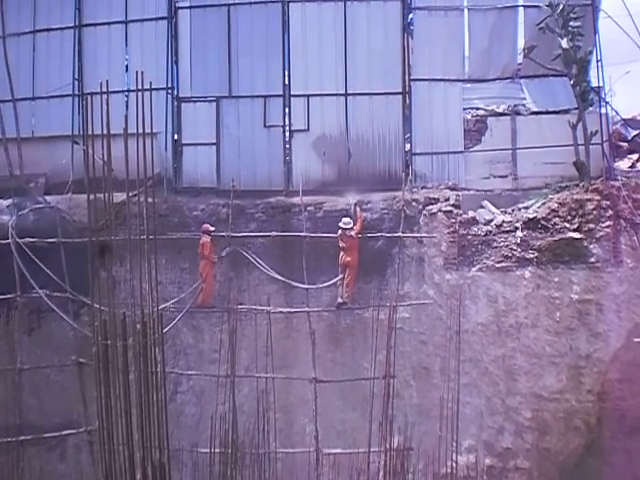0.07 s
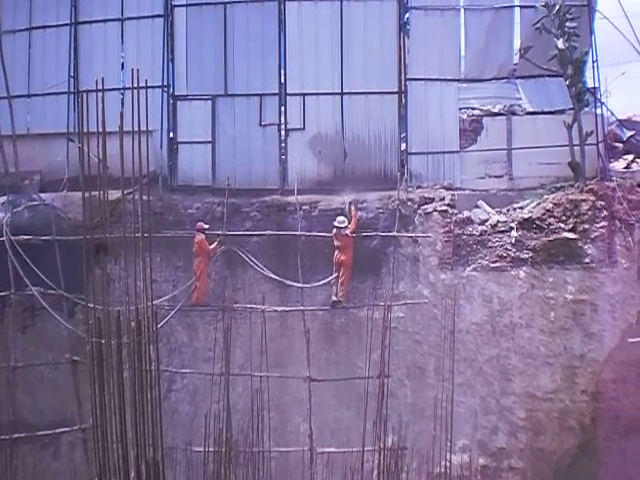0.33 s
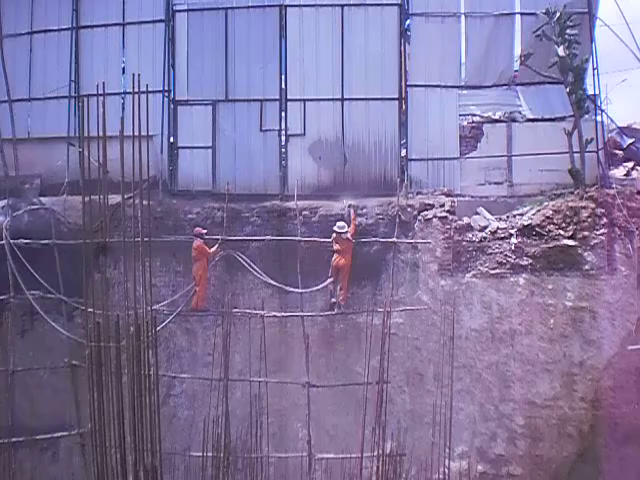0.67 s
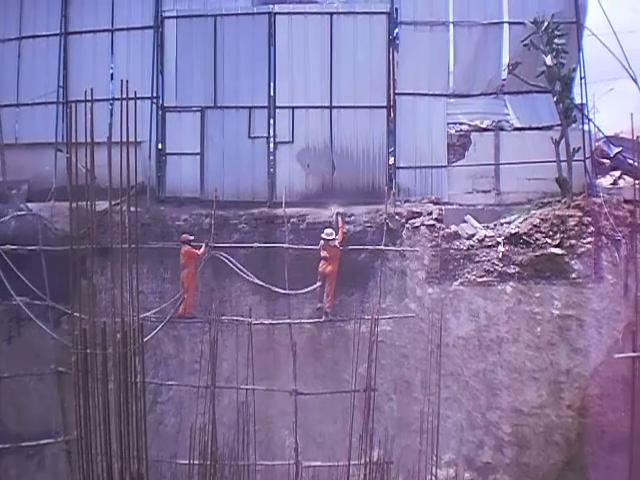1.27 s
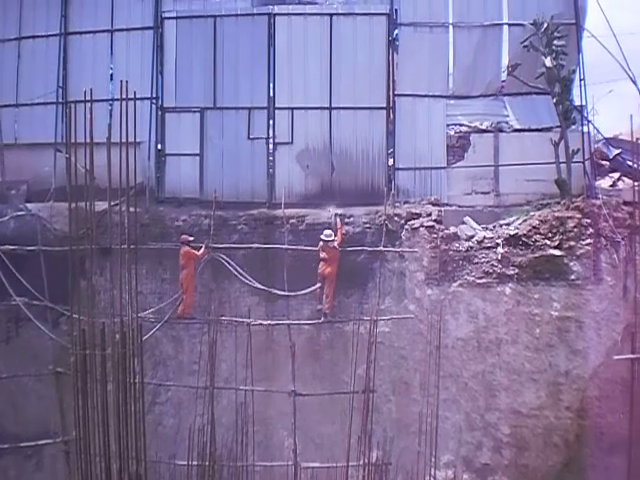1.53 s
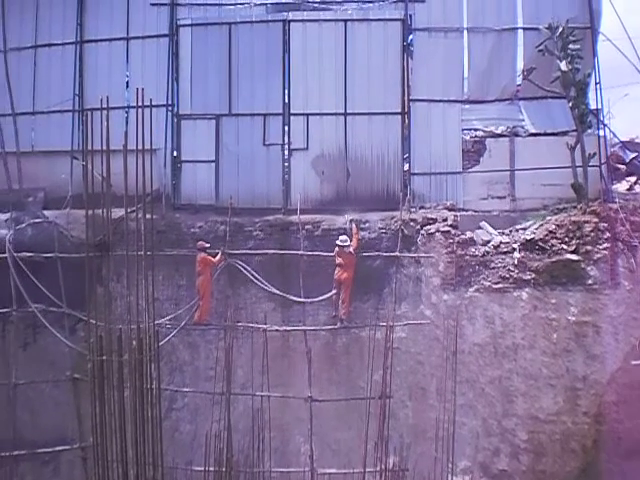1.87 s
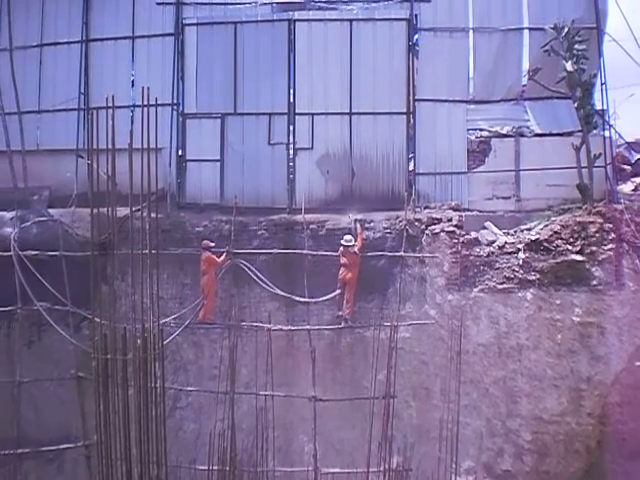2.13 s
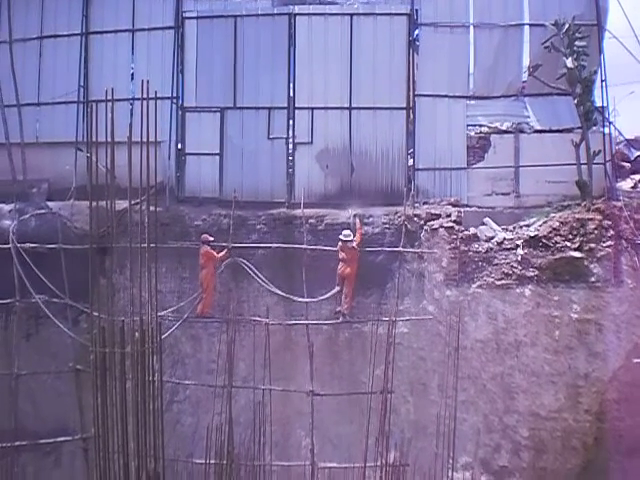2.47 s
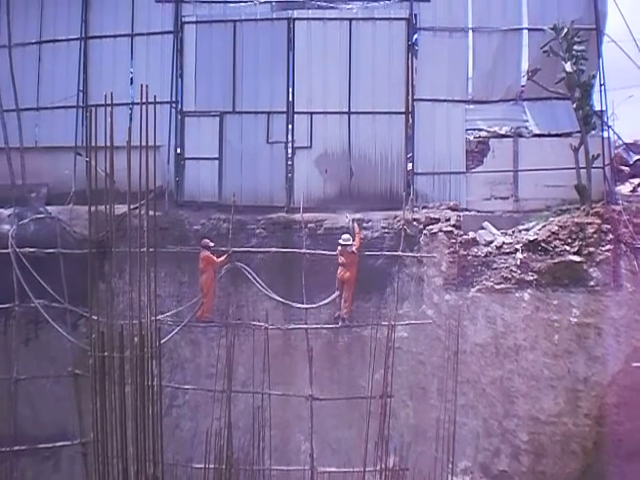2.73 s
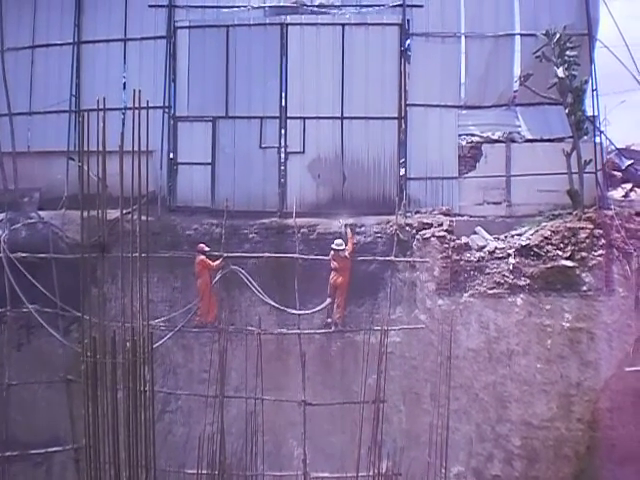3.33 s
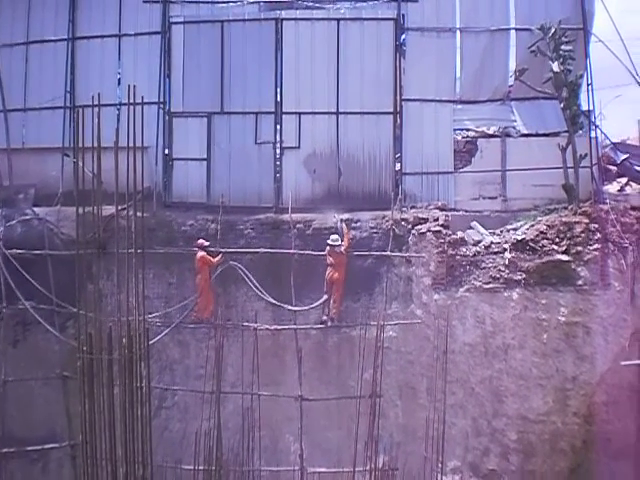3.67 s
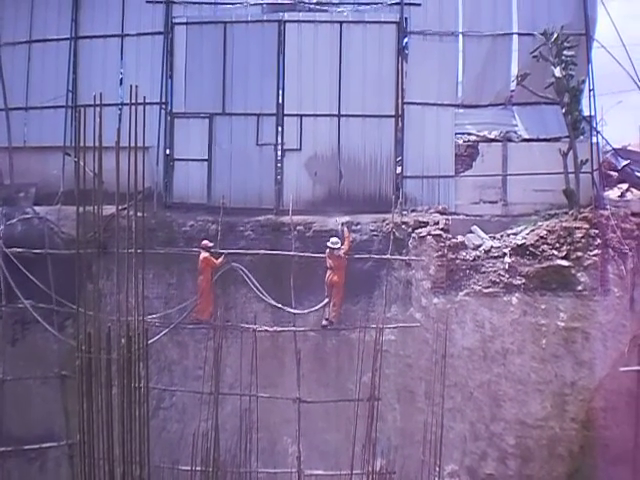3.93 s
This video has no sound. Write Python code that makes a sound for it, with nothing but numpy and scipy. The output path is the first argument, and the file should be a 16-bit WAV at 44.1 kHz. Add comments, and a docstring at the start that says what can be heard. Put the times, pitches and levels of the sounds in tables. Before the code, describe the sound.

Loud hissing jet of sprayed concrete opens up over steady compressor noise.

```python
"""Concrete is sprayed onto the wall of a building pit. From the start a compressor drones under a
steady machine roar, and air hisses from the nozzle, which spits once hard and twice faintly.
At 1.2 s it opens into a hard jet with a hollow whistle in it, washing against the wall.
The recorder passes little treble, and overload ticks crackle over the loud stretches of the jet."""
import sys
import numpy as np
from scipy import signal
from scipy.fft import rfft, irfft
from scipy.io import wavfile

SR = 44100
rng = np.random.default_rng(int(sys.argv[2]) if len(sys.argv) > 2 else 0)


def wav_out(sig):
    """Save sig, one row per channel (or a flat mono array), as 16-bit PCM at SR to the path in sys.argv[1]."""
    wavfile.write(sys.argv[1], SR, np.round(np.clip(np.atleast_2d(sig).T, -1, 1) * 32767).astype(np.int16))


N = 176400
TIME = np.arange(N) / SR


def from_db(db):
    """Decibels to gain."""
    return 10 ** (np.asarray(db) / 20)


def unit_rms(x):
    """Scale to rms 1."""
    return x / np.sqrt(np.mean(x ** 2) + 1e-20)


def automation(rows):
    """One curve per value column, joining its breakpoints in time."""
    times, *columns = np.transpose(rows)
    return [np.interp(TIME, times, column) for column in columns]


def drift(rate_hz):
    """Smooth random wandering, rms about 1."""
    pole = np.exp(-80 * np.pi * rate_hz / SR)
    noise = rng.standard_normal(N // 40 + 2002)  # one value per 40 samples
    slow = signal.lfilter([1], [1, -2 * pole, pole * pole], noise)[2000:]
    return np.interp(np.arange(N) / 40, np.arange(len(slow)), unit_rms(slow))


def turbulence(colour):
    """Noise of the given colour, falling 24 dB per octave beyond its ends; rms 1."""
    hz, db = np.transpose(colour)
    bins_hz = np.maximum(np.arange(N // 2 + 1) * SR / N, 1)
    octaves_outside = np.maximum(np.log2(bins_hz / hz[-1]), 0) + np.maximum(np.log2(hz[0] / bins_hz), 0)
    gain = from_db(np.interp(np.log(bins_hz), np.log(hz), db) - 24 * octaves_outside)
    return unit_rms(irfft(rfft(rng.standard_normal(N)) * gain, N))


def resonance(hz, width_hz):
    """Noise ringing in one resonance with steep skirts; rms 1."""
    bins_hz = np.arange(N // 2 + 1) * SR / N
    response = 1 / (1 + 1j * (bins_hz - hz) / width_hz) ** 2
    return unit_rms(irfft(rfft(rng.standard_normal(N)) * response, N))


def compressor():
    """A nearly pure exhaust note with a weak octave, over a rumble whose low end swells once."""
    # exhaust note: time_s, pitch_hz, level_db
    drone = [(0, 87.2, -20), (1.4, 86.1, -20), (2.5, 86, -21), (3.1, 86, -23.5), (3.45, 86, -25),
             (3.62, 86.3, -27), (3.85, 90.8, -26), (4, 93.7, -20)]
    # machine rumble: frequency_hz, relative_db
    rumble_colour = [(10, -17.5), (22, -1.5), (32, -5), (46, -2), (62, 1), (85, -5.5), (112, -5),
                     (135, -4.5), (165, -7), (220, -12), (400, -41.5)]
    # swell of the deepest rumble: time_s, level_db
    deep_swell = [(0, -38.5), (1.1, -31.5), (1.6, -29), (2.1, -31), (2.6, -37.5), (4, -38.5)]
    pitch_hz, level_db = automation(drone)
    deep_db, = automation(deep_swell)
    phase = 2 * np.pi * np.cumsum(pitch_hz) / SR
    note = np.sqrt(2) * (np.sin(phase) + from_db(-30) * np.sin(2 * phase))
    rumble = from_db(-25) * turbulence(rumble_colour)
    deep = from_db(deep_db) * resonance(hz=45, width_hz=6.1)
    return note * from_db(level_db + .6 * drift(rate_hz=6)) + rumble + deep


def machines():
    """A steady roar with ringing housings, some slowly gaining or losing strength."""
    # housing resonances: pitch_hz, width_hz, starting_level_db, change_db_per_s
    housings = [(148, 15, -38.5, -2.5), (378.6, 19, -34.5, 0.93), (427.5, 34, -40, 1.8),
                (536.8, 20, -44.5, 0), (779, 40, -30.5, -2.5), (863, 38, -37.5, 0), (1022.5, 39, -43, 1.2),
                (1095, 21, -39.5, -1), (1217, 25, -41, 0), (1257, 36, -35, -2), (1378, 19, -41, 0.5)]
    # roar in the pit: frequency_hz, relative_db
    roar_colour = [(120, -16), (200, -6), (250, 0.5), (310, -3.5), (400, -2), (480, -2), (560, -2),
                   (660, -3.5), (790, -0.5), (920, -2.5), (1100, -5), (1350, -3), (1600, -8.5),
                   (1950, -15.5), (2600, -13), (4000, -39.5)]
    rings = sum(from_db(db + db_per_s * TIME) * resonance(hz, width_hz)
                for hz, width_hz, db, db_per_s in housings)
    return from_db(-22.5 + .5 * drift(rate_hz=15)) * turbulence(roar_colour) + rings


def nozzle_air():
    """Air leaves the nozzle in a thin, constant hiss."""
    # escaping air: frequency_hz, relative_db
    air_colour = [(1400, -15), (2000, -11), (2400, -6), (2750, 2.5), (3100, -4.5), (3500, -2), (3750, -4),
                  (4000, -17.5), (4250, -19), (4500, -26)]
    return from_db(-30 + .27 * drift(rate_hz=6)) * turbulence(air_colour)


def spits():
    """Short bright bursts as slugs of mix leave the nozzle."""
    # slugs of mix: centre_s, length_s, level_db
    slugs = [(.415, 0.041, -16), (.485, 0.042, -26), (.85, 0.026, -29.5)]
    # burst of a slug: frequency_hz, relative_db
    spit_colour = [(500, -10.5), (1300, -5.5), (2000, -14.5), (2400, -1), (2950, -0.5), (3300, 0.5),
                   (3700, 0), (4000, -11), (4300, -14.5), (4550, -23)]
    envelope = sum(from_db(db) * np.exp(-2 * ((TIME - centre_s) / length_s) ** 2)
                   for centre_s, length_s, db in slugs)
    return envelope * turbulence(spit_colour)


def jet():
    """A faint hiss jumps to full force; its wash on the wall starts strong, then eases."""
    # strength of the jet: time_s, level_db
    strength = [(0, -35.5), (1.18, -46.5), (1.236, -19), (1.4, -18.5), (1.62, -17), (1.95, -19),
                (2.2, -16.5), (2.3, -16.5), (2.51, -17), (2.66, -19.5), (3.2, -20), (3.55, -20.5), (4, -20)]
    # hiss of the jet: frequency_hz, relative_db
    hiss_colour = [(1500, -17.5), (2020, -10), (2200, -4.5), (2380, 5), (2650, -3.5), (2830, -1),
                   (3030, 0.5), (3220, -5.5), (3400, -5.5), (3560, -4), (3790, -4.5), (3980, -17.5),
                   (4230, -16.5), (4500, -22.5)]
    # mix striking the wall: frequency_hz, relative_db
    wash_colour = [(500, -29.5), (800, -9), (1030, 6), (1230, 2.5), (1450, -0.5), (1680, 2), (1880, -3),
                   (2100, -18.5), (3000, -33)]
    open_s, attack_s, fade_db_per_s = 1.2, .046, 1.0
    jet_db, = automation(strength)
    opened = np.clip((TIME - open_s) / attack_s, 0, 1)
    hiss = from_db(jet_db) * turbulence(hiss_colour)
    wash = opened * from_db(-22 - fade_db_per_s * (TIME - open_s)) * turbulence(wash_colour)
    return hiss + wash + whistle(jet_db, opened)


def whistle(jet_db, opened):
    """The open jet rings the nozzle's resonances; each flutters, and the lowest two flare once."""
    # nozzle resonances: pitch_hz, width_hz, relative_db
    modes = [(2340, 30, -15.5), (2444, 11, -12), (2540, 16, -16.5), (2794, 16, -17.5), (3024, 44, -21.5),
             (3535, 23, -18.5), (3757, 67, -21.5)]
    flare_s, flare_width_s, flare_peak_db, flutter_db = 2.19, .035, 9.5, 2.3
    flare_db = flare_peak_db * np.exp(-.5 * ((TIME - flare_s) / flare_width_s) ** 2)
    rings = np.zeros(N)
    for k, (hz, width_hz, db) in enumerate(modes):
        mode_db = db + flutter_db * drift(rate_hz=4.6) + flare_db * (k < 2)
        rings += from_db(mode_db) * resonance(hz, width_hz)
    average_db = np.average(jet_db, weights=opened)
    drive_db = average_db + .54 * (jet_db - average_db)  # follows about half of the jet's swing
    return opened * from_db(drive_db) * rings


def overload_ticks():
    """Each placed tick is one spike, sharp or blunt, with a very short ring."""
    # overload ticks: start_s, level_db, cutoff_hz
    ticks = [(1.358, -31, 15000), (1.3635, -17, 10100), (1.46, -38, 16000), (1.567, -29, 4400),
             (1.5748, -20, 5800), (1.592, -22.5, 16000), (1.6425, -24.5, 16100), (1.661, -22, 4500),
             (1.6675, -25, 15000), (1.695, -26, 16000), (1.72, -24, 4500), (1.727, -26, 16000),
             (1.74, -29, 4800), (1.7703, -22, 16000), (1.7955, -20, 4400), (1.811, -19.5, 16000),
             (2.098, -41, 16000), (2.2642, -30.5, 11000), (2.27, -26, 5400), (2.3225, -17, 4800),
             (2.3315, -25, 16000), (2.345, -16, 10500), (2.3645, -33, 16000), (2.386, -20, 16000),
             (2.407, -26, 4100), (2.451, -16, 5200), (2.455, -23, 16000), (2.473, -33, 16000),
             (2.5124, -27, 15200), (2.566, -18, 4420), (2.572, -28, 10000), (2.734, -47, 16000),
             (2.9825, -23, 4400), (2.992, -29, 15000), (3.011, -31.5, 16000), (3.127, -31, 15000)]
    ring_hz, ring_decay_s, dull_hz = 4650, .001, 3000
    out, t = np.zeros(N), TIME[:SR // 100]
    ring = from_db(-14.5) * np.exp(-t / ring_decay_s) * np.cos(2 * np.pi * ring_hz * t)
    spike = np.exp(-2 * np.pi * dull_hz * t) + ring
    for start_s, db, cutoff_hz in ticks:
        tick = signal.sosfilt(signal.butter(6, cutoff_hz, fs=SR, output="sos"), spike)
        start = int(start_s * SR)
        out[start:start + len(tick)] += from_db(db) * rng.choice([-1, 1]) * tick
    return out


def pit_echoes(direct):
    """A few dull wall echoes hollow out the sound."""
    # reflections off the pit walls and hoarding: delay_s, level_db
    echoes = [(.0116, -19), (.01722, -14), (.0183, -19), (.0413, -19), (.05845, -14)]
    dull_hz = 3530
    dull = signal.sosfilt(signal.butter(1, dull_hz, fs=SR, output="sos"), direct)
    return direct + sum(from_db(db) * np.interp(TIME - delay_s, TIME, dull, left=0)
                        for delay_s, db in echoes)


def scene():
    """All sources at one distant microphone; only the compressor has no echo."""
    drone = compressor()
    roar = machines()
    spray = nozzle_air() + jet()
    sputter = from_db(.69 * drift(rate_hz=40))  # uneven feed of the mix
    return (drone + pit_echoes(roar + spray * sputter + spits()))[None]


def record(dry):
    """Peaks are rounded, the treble ends steeply, overload ticks and faint hiss lie on top."""
    ceiling, treble_stop_hz, cutoff_hz = .7, 4800, 15900
    rounded = dry / (1 + (dry / ceiling) ** 8) ** (1 / 8)
    narrow = signal.sosfiltfilt(signal.cheby2(14, 50, treble_stop_hz, fs=SR, output="sos"), rounded)
    mix = narrow + overload_ticks() + from_db(-103) * rng.standard_normal(N)
    return signal.sosfilt(signal.butter(16, cutoff_hz, fs=SR, output="sos"), mix)


dry = scene()
out = record(dry)
wav_out(out)
```